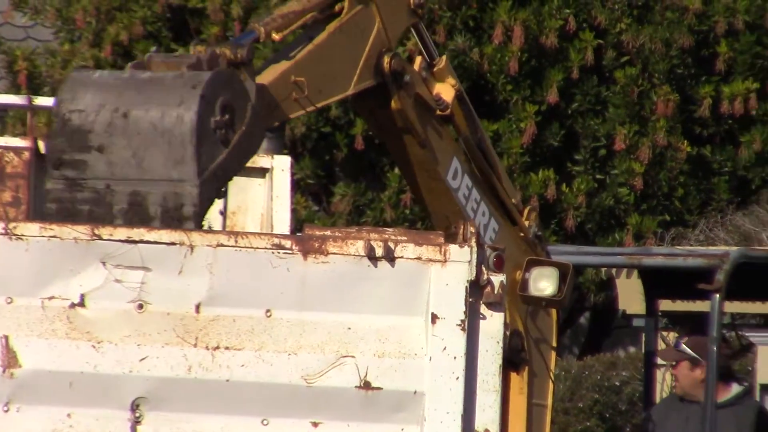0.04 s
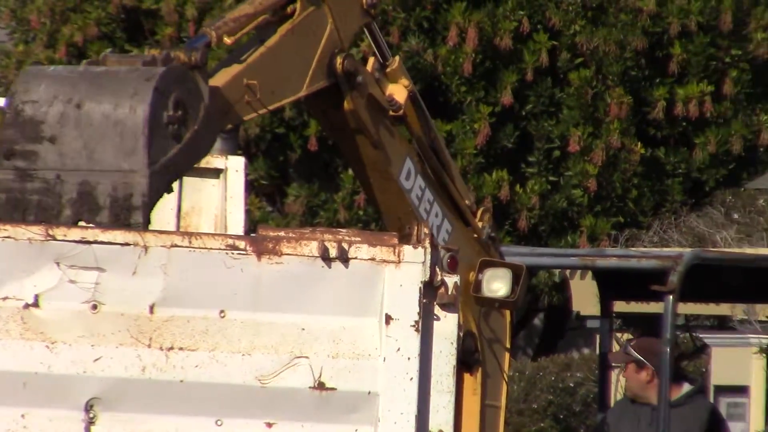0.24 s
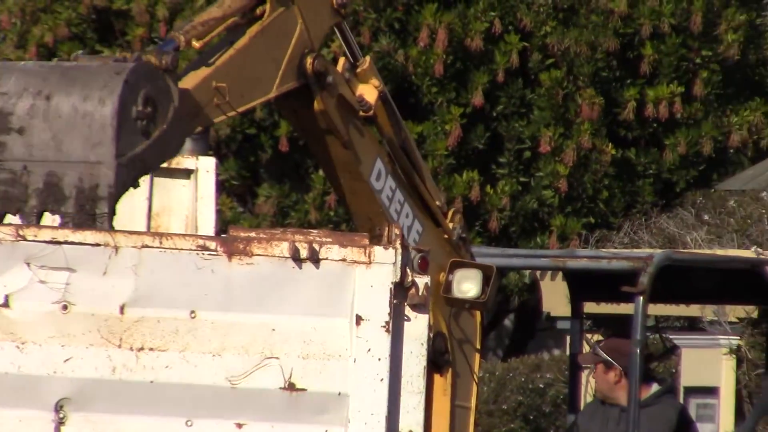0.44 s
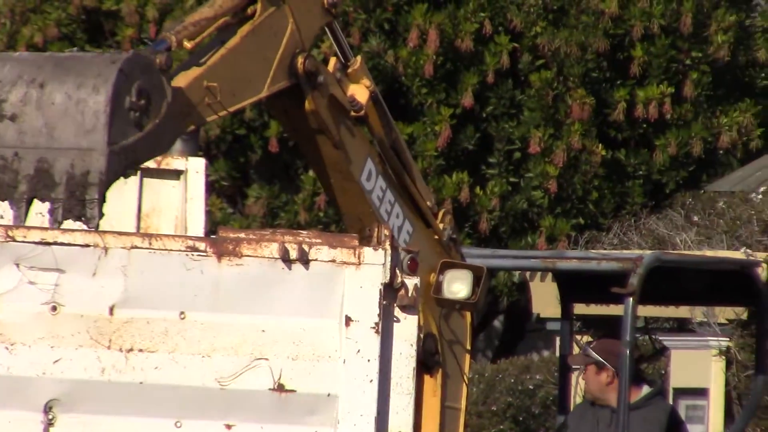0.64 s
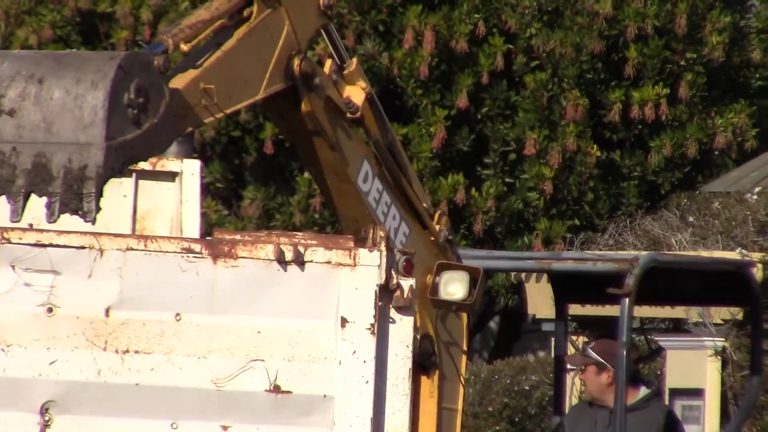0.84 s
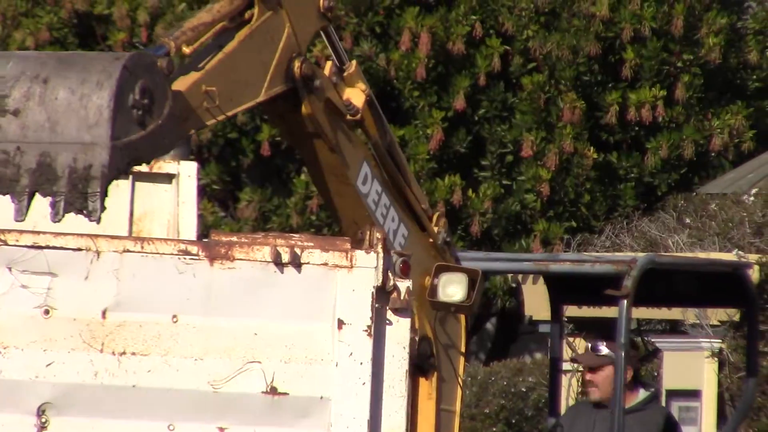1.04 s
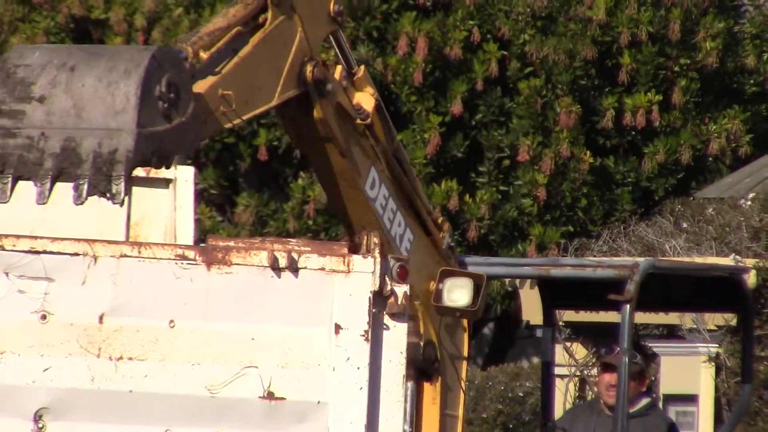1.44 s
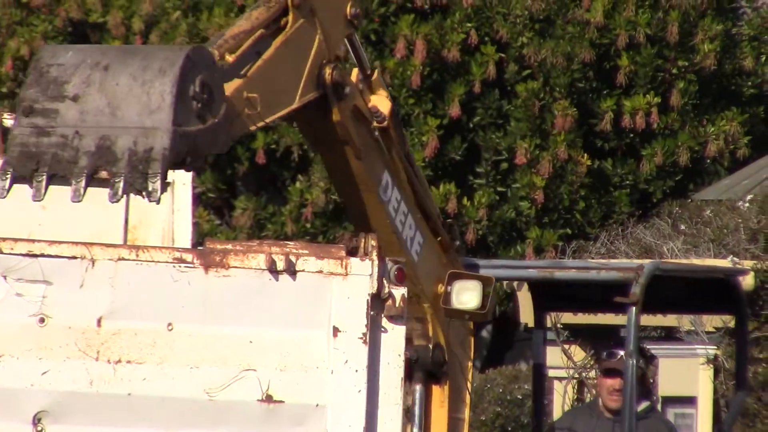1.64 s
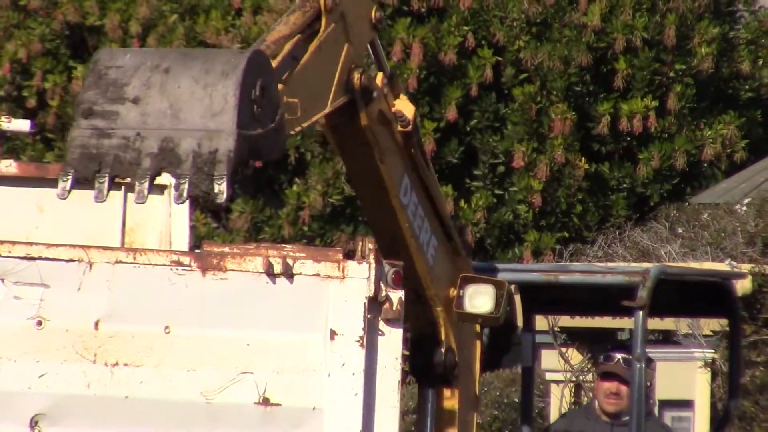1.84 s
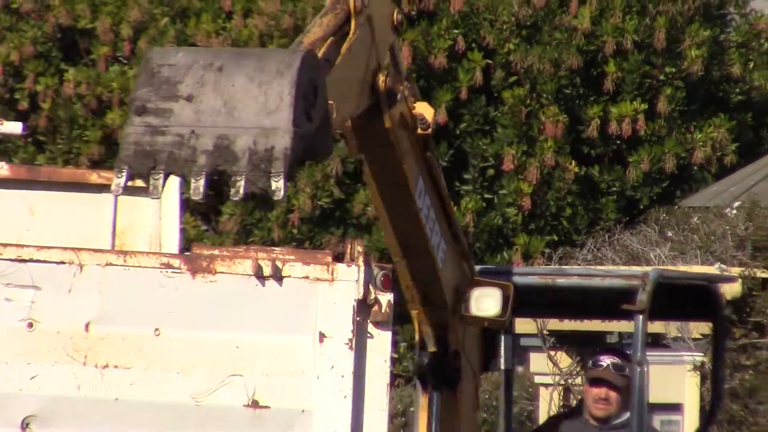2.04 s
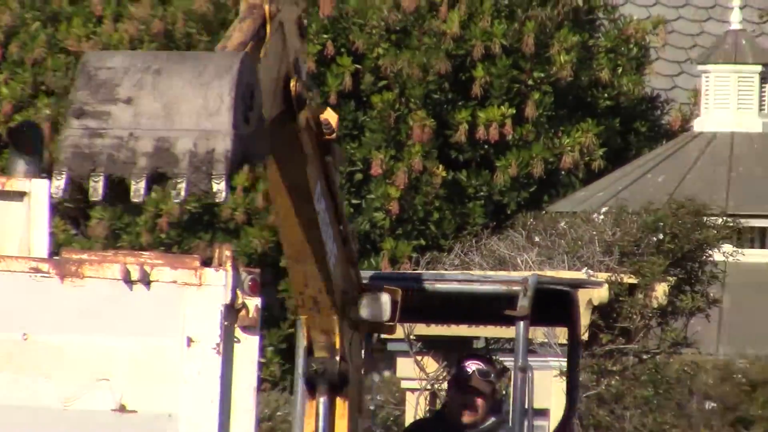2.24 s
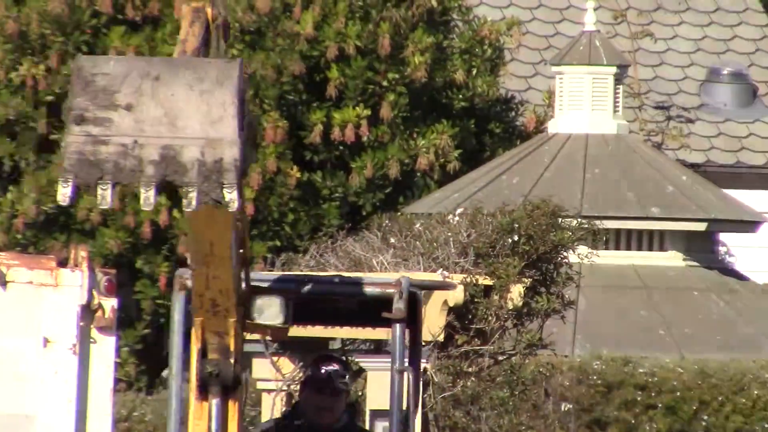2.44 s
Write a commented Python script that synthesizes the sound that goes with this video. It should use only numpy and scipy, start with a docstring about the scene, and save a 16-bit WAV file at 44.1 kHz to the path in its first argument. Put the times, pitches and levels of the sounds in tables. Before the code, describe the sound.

A steel backhoe bucket clanks against a truck bed in quick, ringing double blows from about 0.1 to 0.8 seconds, echoing lightly outdoors. The bucket scrapes free near 0.85 seconds and the bed booms softly until about 1.1. A quieter diesel engine clatters steadily throughout, some way off, growing slightly louder toward the end at 2.6 seconds, with faint high ticks from the arm around 1.6 and 2.2.

```python
"""A backhoe's steel bucket clanks against a truck bed in a quick run of double blows, each ringing the
steel's modes. The bed booms briefly after them and the bucket scrapes free. The diesel engine runs on
steadily with a combustion clatter, and the swinging arm ticks faintly. Outdoors, microphone some way
off: hedges and houses answer the steel, and the sound is all but mono."""
import sys
import numpy as np
from scipy import signal
from scipy.fft import rfft, irfft, next_fast_len
from scipy.io import wavfile
from scipy.ndimage import map_coordinates

SR = 44100
rng = np.random.default_rng(int(sys.argv[2]) if len(sys.argv) > 2 else 0)


def output_pcm(signal):
    """Save a mono or channel-first signal as 16-bit PCM at the path in sys.argv[1].

    Samples are clipped to [-1, 1] before scaling.
    """
    pcm = np.clip(np.atleast_2d(signal).T, -1, 1) * 32767
    wavfile.write(sys.argv[1], SR, np.round(pcm).astype(np.int16))


N = 114660

# how long the yard rings (frequency [Hz], t60 [s])
YARD_DECAY = [(150, 1), (800, 0.66), (2500, 1.6), (5000, 0.71), (12000, 0.14)]
# tone of the yard's answer (frequency [Hz], relative level [dB])
YARD_SPECTRUM = [(150, 7.5), (800, -1), (2500, -7), (5000, -3.5), (12000, 4.5)]
# engine load (time [s], rush level [dB], knock level [dB])
ENGINE_LOAD = [(0, -42.5, -50.5), (1.15, -42.5, -51), (1.8, -42, -49), (2.6, -41, -53)]
# exhaust hum (harmonic of the firing rate, level [dB])
EXHAUST_HARMONICS = [(2, -71.5), (3, -67.5), (6, -65.5)]
# fan and gear rush (frequency [Hz], relative density [dB])
RUSH_SPECTRUM = [(20, -40), (60, -36), (80, -40), (110, -26), (170, -18), (215, -14.5), (300, -9.5),
                 (420, -14.5), (620, -7), (830, -4.5), (1130, -11), (1450, -7.5), (2050, -13),
                 (2450, -13.5), (4100, -23.5), (7400, -29.5), (11000, -41), (15500, -52)]
# four cylinders knock unequally (relative level [dB])
CYLINDER_LEVELS = [-0.58, -0.48, -0.4, -0.038]
# ticks of the swinging arm (time [s], level [dB], half-width [s])
ARM_TICKS = [(1.545, -55, .002), (1.673, -50.5, .002), (2.19, -53, .002)]
# their tone (frequency [Hz], relative density [dB])
TICK_SPECTRUM = [(500, -40), (4000, -14), (5500, 1), (7500, 3), (10500, -14), (15000, -35)]
# scrapes of the bucket (time [s], level [dB], half-width [s])
BUCKET_SCRAPES = [(.822, -45, 0.0073), (.841, -38.5, 0.011), (.878, -45.5, .008)]
# their tone (frequency [Hz], relative density [dB])
SCRAPE_SPECTRUM = [(100, -43), (300, -9), (800, -6), (1300, 11), (2800, 3), (4400, 3), (5500, -7),
                   (15000, -58)]
# shudders of the truck bed (time [s], level [dB], half-width [s])
BED_BOOMS = [(.808, -48, 0.02), (.945, -44, 0.024), (1.04, -53.5, .035)]
# their tone (frequency [Hz], relative density [dB])
BOOM_SPECTRUM = [(70, -37), (105, -7), (150, -3), (205, 4.5), (290, -7), (600, -46), (2500, -90)]
# the crowd of short-lived plate modes (frequency [Hz], relative density [dB])
PLATE_SPECTRUM = [(90, -56), (220, -15.5), (500, -6.5), (780, 4), (1020, -4.5), (1280, -1), (1650, -1),
                  (2350, 1), (3000, -0.5), (3900, -6.5), (4400, -12), (5400, -18.5), (6600, -10.5),
                  (8300, -16), (10000, -19.5), (11200, -17.5), (13400, -25.5), (14500, -53)]
# how they swell and die (frequency [Hz], rise [s], base t60 [s])
PLATE_ENVELOPE = [(200, 0.0045, 0.22), (820, 0.0093, 0.15), (2550, 0.00066, 0.13), (6500, 0.001, 0.074),
                  (12000, 0.00031, 0.021)]
# the clearest modes of bucket and bed (frequency [Hz], relative level [dB], base t60 [s])
STEEL_MODES = [(624.3, -12.5, 0.18), (771, -1.5, 0.073), (821, -3, .2), (1247, -4.5, 0.11),
               (1352, -5, 0.12), (1780, -17, 0.18), (1859, -15.5, 0.34), (2030, -43, .13),
               (2196, -4.5, 0.067), (2347, 0.5, 0.051), (2570, -8.5, 0.25), (2815, -8.5, .13),
               (2980, -13.5, 0.092), (3150, -13.5, 0.16), (3480, -14, 0.14), (3970, -8.5, 0.054)]
# steel contacts (time [s], level [dB], treble [dB], bass [dB], top of the band [Hz],
# pitch favoured by the spot struck [Hz], its boost [dB], ring time factor)
CONTACTS = [(0.0918, -30.5, -4.5, 11.5, 7460, 3900, 16, 0.95),
            (0.1197, -34.5, -8, 6, 12000, 820, 7.5, 0.84), (.1716, -42.5, -3, -11, 8000, 3050, 8, 1.2),
            (.208, -39.5, -2, 6, 8000, 3600, 15.5, 1.2), (0.2311, -20, -4, -8, 8800, 2270, 6, 0.97),
            (.2560, -23.5, -2, 7, 10300, 2740, 10, 0.9), (0.2766, -32, 0, -2, 8000, 3160, 8, 1.5),
            (.3243, -16.5, 9.5, -12, 14000, 3780, 2, 0.74),
            (0.3403, -19.5, -3, 4.5, 10100, 2380, 4.5, 1.12), (0.3598, -32.5, 13, 8, 14000, 1250, 10, 0.65),
            (.4215, -29, 0.5, 1.5, 11000, 810, 4.5, 0.81), (.4384, -21, -1, -0.5, 9500, 2150, 5, 1.22),
            (.4460, -36, 3, 3, 12500, 3400, 9, 1.7), (.4600, -23.5, -1.5, 1, 9500, 3700, 10, 0.89),
            (0.474, -29.5, -1, -33, 8000, 3570, 3, 2.34), (0.5241, -20, 5, 5.5, 14000, 10900, 8.5, 0.96),
            (.5408, -16.5, -2, -1.5, 12000, 2266, 11, 0.59), (.5505, -26, 4, 7, 9900, 2080, 9.5, 1.13),
            (0.561, -26.5, 3, 14.5, 11000, 690, 10.5, 0.69), (.6610, -28.5, -14, 6, 7000, 2250, 8, 0.71),
            (.7395, -20.5, -1.5, 7, 12500, 6400, 6.5, 1.18), (.7555, -23, -2, -15, 11000, 2200, 3, 1.23)]


def amp(db):
    """Decibels to gain."""
    return 10 ** (np.asarray(db) / 20)


def unit(x):
    """Scaled to rms 1."""
    return x / np.sqrt(np.mean(x ** 2) + 1e-20)


def along(points, hz):
    """(frequency [Hz], value) points read on a log axis."""
    freqs, values = np.transpose(points)
    return np.interp(np.log(hz + 1), np.log(freqs + 1), values)


def filtered(x, response):
    """x through a frequency response."""
    size = x.shape[-1]
    padded = next_fast_len(size + 8192)
    return irfft(rfft(x, padded) * response(np.fft.rfftfreq(padded, 1 / SR)), padded)[..., :size]


def resonance(hz, centre, width):
    """Response of one damped resonance."""
    return 1j * hz * width / (centre ** 2 - hz ** 2 + 1j * hz * width)


def noise(spectrum, size, envelope=1):
    """White noise under an envelope, coloured and scaled to rms 1."""
    return unit(filtered(envelope * rng.standard_normal(size), lambda hz: amp(along(spectrum, hz))))


def wobble(rate):
    """A smooth random curve, rate knots a second."""
    return map_coordinates(rng.standard_normal(256), [np.arange(N) * rate / SR], mode="mirror")


def swells(bursts, spectrum):
    """Short bell-shaped bursts of coloured noise."""
    t = np.arange(N) / SR
    envelope = sum(amp(db) * np.exp(-.5 * ((t - at) / width) ** 2) for at, db, width in bursts)
    return noise(spectrum, N) * envelope


def yard(source, build_up_s=0.02):
    """Hedges and houses scatter a diffuse tail back to the microphone."""
    hz, t, spectra = signal.stft(rng.standard_normal(SR), SR, nperseg=256)
    decay = amp(along(YARD_SPECTRUM, hz)[:, None] - 60 * t / along(YARD_DECAY, hz)[:, None])
    tail = signal.istft(spectra * decay, SR, nperseg=256)[1]
    tail *= 1 - np.exp(-np.arange(len(tail)) / SR / build_up_s)
    return signal.fftconvolve(source, tail / np.linalg.norm(tail))[:N]


def engine(firing_hz=49.03, knock_t60_s=0.078, scatter_db=1.5, block_hz=797, block_width_hz=170):
    """A diesel at steady speed: exhaust hum, fan and gear rush, a knock in the block at each firing."""
    t = np.arange(N) / SR
    firings = np.cumsum(firing_hz * (1 + .003 * wobble(4))) / SR
    strengths = amp(np.resize(CYLINDER_LEVELS, 256) + scatter_db * rng.standard_normal(256))
    since_firing = (firings % 1) / firing_hz
    pulses = unit(strengths[firings.astype(int)] * amp(-60 * since_firing / knock_t60_s))
    combustion = pulses * rng.standard_normal(N)
    knock = unit(filtered(combustion, lambda hz: resonance(hz, block_hz, block_width_hz) ** 2))
    rush = noise(RUSH_SPECTRUM, N, envelope=1 + .1 * pulses)  # clatters with the firings
    hum = np.zeros(N)
    for harmonic, db in EXHAUST_HARMONICS:
        wavering_peak = np.sqrt(2) * amp(db + 3.4 * wobble(6.3))
        hum += wavering_peak * np.sin(2 * np.pi * (harmonic * firings + rng.random()))
    times, rush_db, knock_db = np.transpose(ENGINE_LOAD)
    return amp(np.interp(t, times, rush_db)) * rush + amp(np.interp(t, times, knock_db)) * knock + hum


def arm_ticks():
    """Faint high ticks as the arm swings."""
    return swells(ARM_TICKS, TICK_SPECTRUM)


def bucket_scrapes():
    """Light scrapes as the bucket comes free."""
    return swells(BUCKET_SCRAPES, SCRAPE_SPECTRUM)


def bed_booms():
    """The truck bed shudders low after the blows."""
    return swells(BED_BOOMS, BOOM_SPECTRUM)


def plate_crash(t, ring_factor, crack_db=0.5, crack_s=0.0026):
    """Dense steel modes: the treble cracks at once, the bass swells and lingers."""
    centres = np.geomspace(100, 12800, 15)
    crossovers = [np.column_stack([centres, weights]) for weights in np.eye(len(centres))]
    modes = noise(PLATE_SPECTRUM, len(t))
    bands = filtered(modes, lambda hz: np.array([along(band, hz) for band in crossovers]))
    timing = np.array(PLATE_ENVELOPE)
    rise, t60 = (along(timing[:, [0, column]], centres)[:, None] for column in (1, 2))
    envelopes = (1 - np.exp(-t / rise)) * amp(-60 * t / (t60 * ring_factor))
    crack = amp(crack_db * np.exp(-(t / crack_s) ** 2))
    return (bands * envelopes).sum(0) * crack


def steel_ring(t, ring_factor, rise_s=0.0011, scatter_db=1.5):
    """The clear modes of bucket and bed, excited a little differently by each contact."""
    hz, db, t60 = np.transpose(STEEL_MODES)[:, :, None]
    envelopes = amp(db + scatter_db * rng.standard_normal(hz.shape) - 60 * t / (t60 * ring_factor))
    modes = np.sin(2 * np.pi * (hz * t + rng.random(hz.shape)))
    return (envelopes * modes).sum(0) * (1 - np.exp(-t / rise_s))


def bucket_clanks(treble_hz=5400, bass_hz=640, spot_relative_width=0.062):
    """Each contact rings the steel: sharp ones bright, heavy ones deep, each spot favouring a pitch."""
    track = np.zeros(N)
    t = np.arange(SR // 4) / SR
    for at, db, treble_db, bass_db, top_hz, spot_hz, spot_db, ring_factor in CONTACTS:
        def tone(hz):
            treble = amp(treble_db / (1 + (treble_hz / (hz + 1)) ** 4))
            bass = amp(bass_db / (1 + (hz / bass_hz) ** 4))
            roll_off = 1 / np.sqrt(1 + (hz / top_hz) ** 10)
            spot = 1 + (amp(spot_db) - 1) * resonance(hz, spot_hz, spot_relative_width * spot_hz)
            return treble * bass * roll_off * spot

        clank = plate_crash(t, ring_factor) + amp(-6) * steel_ring(t, ring_factor)
        start = round(at * SR)
        track[start:start + len(t)] += amp(db) * filtered(clank, tone)
    return track


def scene(yard_db=-14, hiss_db=-77.5):
    """The backhoe across the yard, dead centre; a faint hiss, different left and right, lies under it all."""
    steel = bucket_clanks() + bucket_scrapes()
    mono = steel + amp(yard_db) * yard(steel) + bed_booms() + arm_ticks() + engine()
    return mono + amp(hiss_db) * rng.standard_normal((2, N))


def record(dry, top_hz=15650):
    """The microphone chain passes nothing above its band limit."""
    return filtered(dry, lambda hz: hz < top_hz)


dry = scene()
out = record(dry)
output_pcm(out)
```